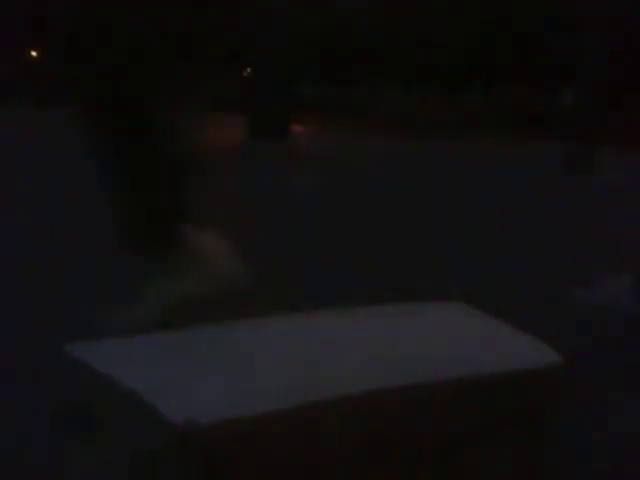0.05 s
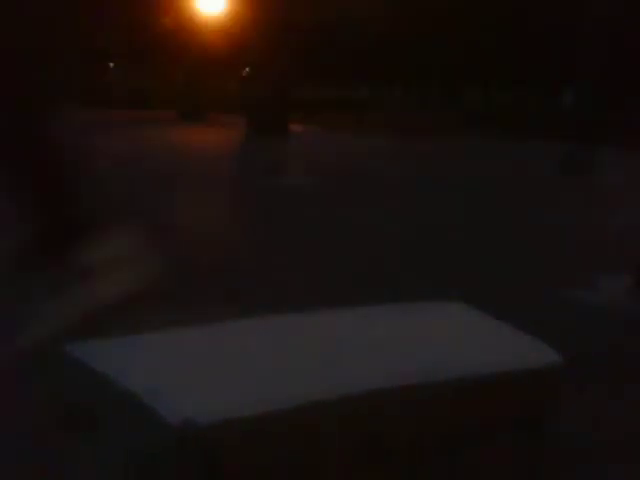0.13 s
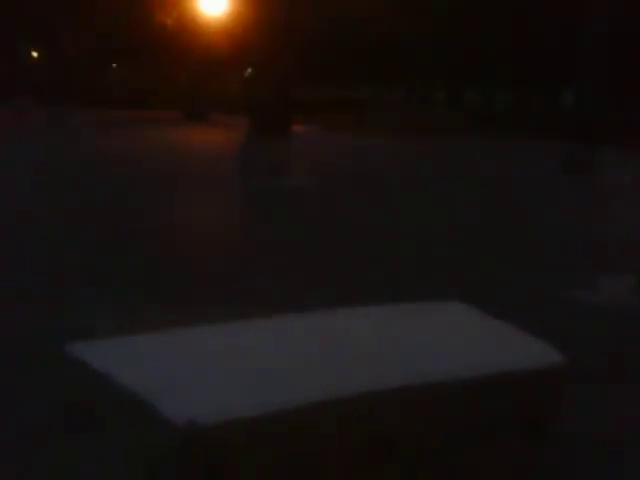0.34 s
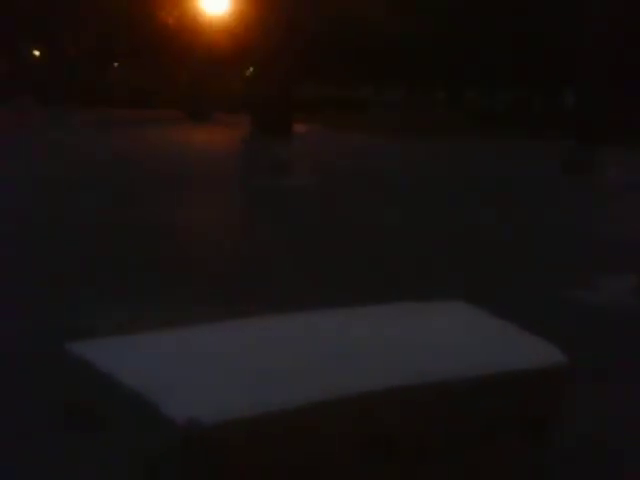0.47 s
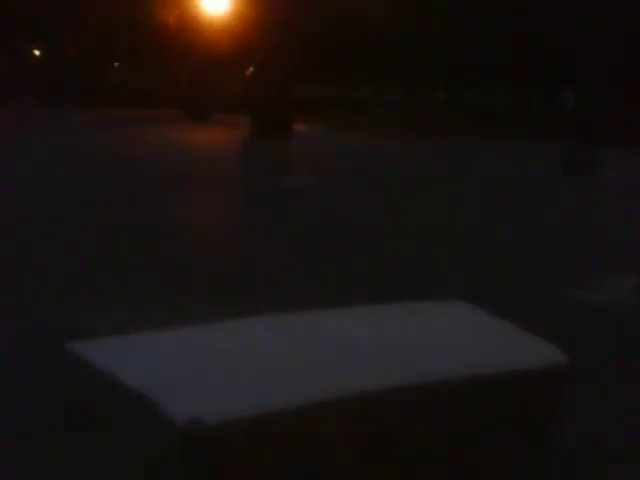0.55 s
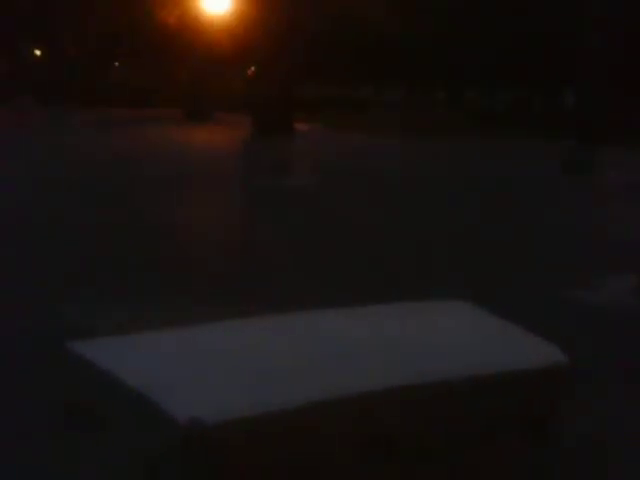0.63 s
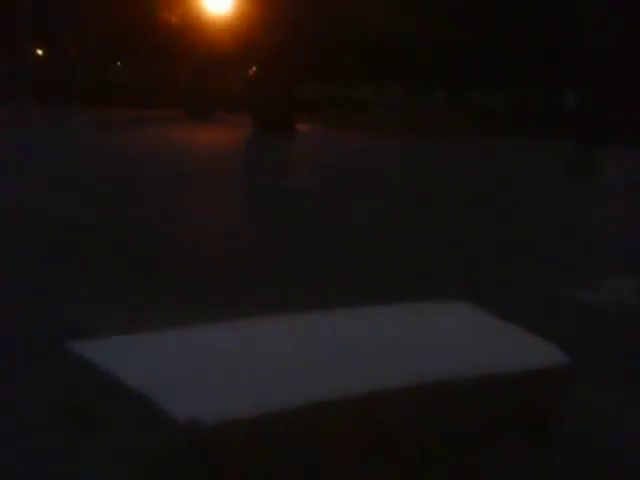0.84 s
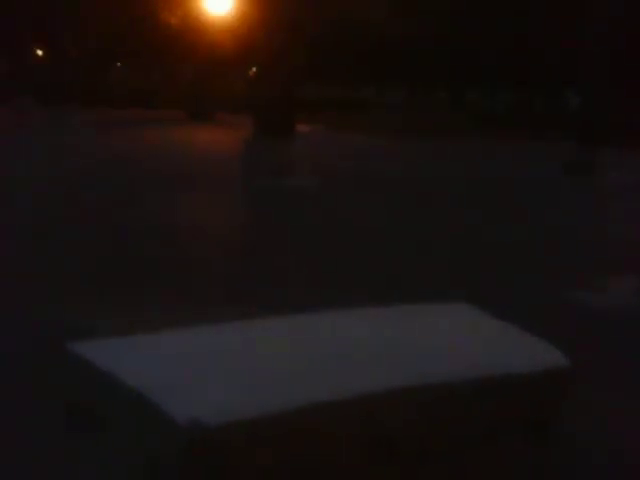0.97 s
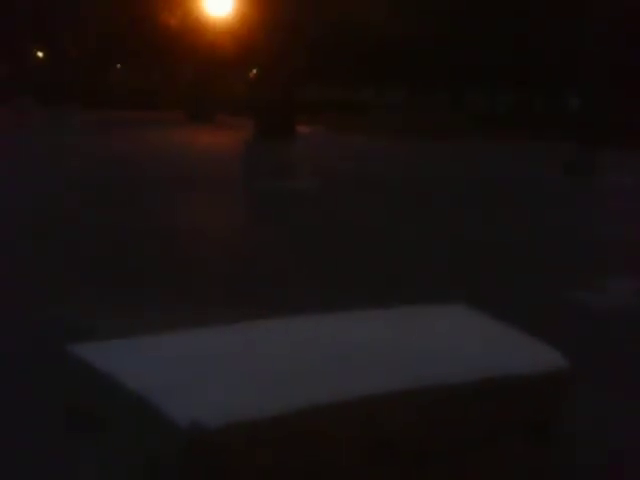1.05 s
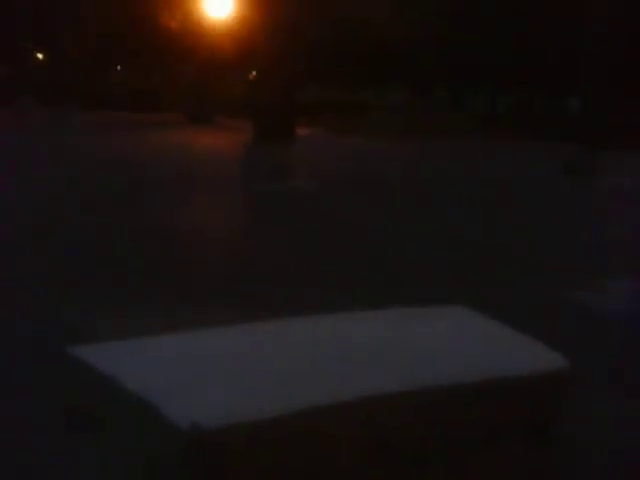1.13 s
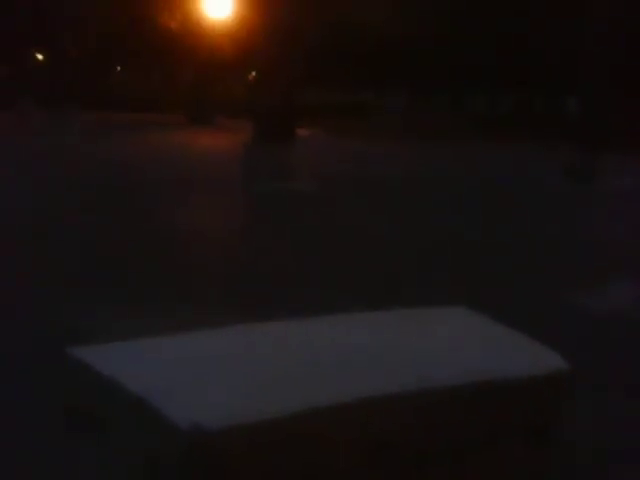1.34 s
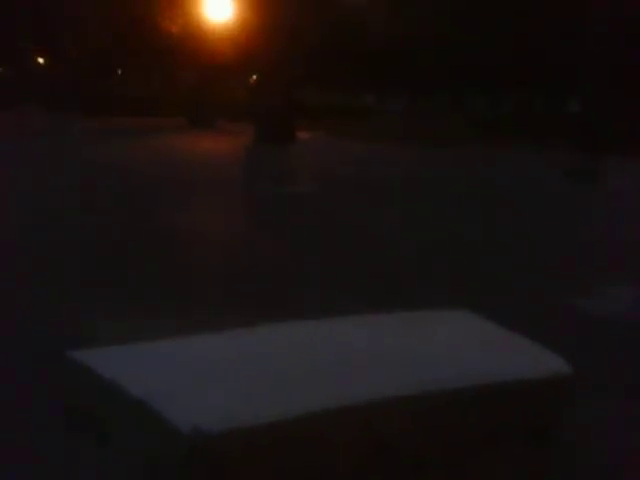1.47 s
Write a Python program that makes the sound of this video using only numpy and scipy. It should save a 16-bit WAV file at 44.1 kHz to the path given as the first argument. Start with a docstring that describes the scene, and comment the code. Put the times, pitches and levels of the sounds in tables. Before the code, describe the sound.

Inline skates clack down on concrete and roll away over a distant town rumble.

```python
"""Inline skates landing at night

Skates clip a ledge and slap down on the concrete of an open skate park. Each knock is a clack of
frame and wheels, a thud of boot and ledge, and a gritty scrape; the loudest overload a small, dull
microphone. The wheels roll away with a tick or two over a distant town rumble, and a faint high
whine warbles throughout."""
import sys
import numpy as np
from scipy import signal
from scipy.fft import rfft, irfft
from scipy.io import wavfile
from scipy.ndimage import uniform_filter1d

SR = 44100
rng = np.random.default_rng(int(sys.argv[2]) if len(sys.argv) > 2 else 0)


def persist_wave(psi):
    """Save psi, clipped to +-1, as 16-bit WAV."""
    counts = np.round(np.clip(psi, -1, 1) * 32767).astype(np.int16)
    wavfile.write(sys.argv[1], SR, np.atleast_2d(counts).T)


N = 66150  # 1.5 seconds


def from_db(db):
    """Turn decibels into a number to multiply a sound by."""
    return 10 ** (np.asarray(db) / 20)


def seconds():
    """The time of every sample."""
    return np.arange(N) / SR


def noise(spectrum):
    """Noise of typical size 1, shaped by rows of frequency and level, with nothing above 5000 Hz."""
    hz, db = np.transpose(spectrum)
    freqs = np.maximum(np.fft.rfftfreq(N, 1 / SR), 1)
    gain = from_db(np.interp(np.log(freqs), np.log(hz), db)) * (freqs < 5000)
    shaped = irfft(rfft(rng.standard_normal(N)) * gain, N)
    return shaped / shaped.std()


def drift(rate_hz):
    """A smooth random wobble of typical size 1; a higher rate wobbles faster."""
    pole = np.exp(-2 * np.pi * rate_hz / SR)
    wobble = signal.lfilter([1], [1, -2 * pole, pole * pole], rng.standard_normal(2 * N))[N:]
    return wobble / wobble.std()


# The tone of the town. Each row: frequency in Hz, relative level in dB.
TOWN_SPECTRUM = [(20, -18), (40, -5), (70, -3), (150, -1), (280, -4.5), (450, -9), (620, -12), (900, -7),
                 (1150, -12), (1550, -22.5), (2000, -24), (3400, -23), (4100, -36)]

def distant_town(level_db=-33.5):
    """The far-off town blends into a steady rumble and hiss."""
    return from_db(level_db) * noise(TOWN_SPECTRUM)


# How far the whine swings. Each row: time in seconds, lowest pitch in Hz, highest pitch in Hz.
WHINE_RANGE = [(0, 2304, 3742), (0.599, 2653, 3680), (1.001, 2898, 3525), (1.5, 2874, 3544)]

def warbling_whine(warble_hz=24.42, whine_db=-48.5, pip_db=-56):
    """A thin, raspy tone sags and climbs many times a second, with a higher pip on each climb."""
    t = seconds()
    times, lows, highs = np.transpose(WHINE_RANGE)
    low_hz, high_hz = np.interp(t, times, lows), np.interp(t, times, highs)
    cycle = (t - .008) * warble_hz % 1
    hold_end, fall_end = 0.14, 0.71  # shares of one cycle
    sag = np.minimum((fall_end - cycle) / (fall_end - hold_end), 1) ** 4
    climb = np.sin(np.pi / 2 * (cycle - fall_end) / (1 - fall_end))
    height = np.where(cycle < fall_end, sag, climb)  # 0 at the bottom, 1 at the top
    # Fast wobbles in pitch and level make both tones raspy.
    whine_hz = low_hz + (high_hz - low_hz) * height + 85 * drift(rate_hz=90)
    whine_gain = from_db(whine_db + 1.5 * height + 2.5 * drift(rate_hz=70))
    pip_hz = 3960 + 70 * drift(rate_hz=90)
    pip_gain = height * from_db(pip_db + 2.5 * drift(rate_hz=70))
    whine = whine_gain * np.sin(2 * np.pi * np.cumsum(whine_hz) / SR)
    pip = pip_gain * np.sin(2 * np.pi * np.cumsum(pip_hz) / SR)
    return whine + pip


# The tone of wheels on concrete. Each row: frequency in Hz, relative level in dB.
ROLL_SPECTRUM = [(60, -8), (130, -2), (180, 3), (240, -2), (330, 6), (420, -1), (520, -15.5), (780, -11.5),
                 (1150, -9.5), (1600, -37.5), (2400, -16.5), (3400, -43.5), (4100, -34)]

def rolling_wheels(start_s=0.26, rise_s=0.01, start_db=-33.5, fade_db_per_s=3.5):
    """After the landing the wheels rumble unevenly and fade as they roll away."""
    age = np.maximum(seconds() - start_s, 0)
    fade_in = np.minimum(age / rise_s, 1)
    level_db = start_db - fade_db_per_s * age + 2.5 * drift(rate_hz=20.3)
    return fade_in * from_db(level_db) * noise(ROLL_SPECTRUM)


# The tone of the park's echo. Each row: frequency in Hz, relative level in dB.
ECHO_SPECTRUM = [(60, -36), (150, -14.5), (260, -3), (400, -31.5), (550, -13), (800, -0.5), (1200, -5),
                 (1700, -4.5), (2300, -6.5), (4000, -9.5)]

def park_echo(sound, level_db=-11, build_s=0.004, fade_s=0.88):
    """Ramps and trees scatter the sound back as a weak, dull tail."""
    t = seconds()
    tail = noise(ECHO_SPECTRUM) * (1 - np.exp(-t / build_s))
    tail *= np.exp(-np.log(1000) * t / fade_s)  # 60 dB down after fade_s
    strongest_band_power = np.max(uniform_filter1d(np.abs(rfft(tail)) ** 2, size=200))
    tail /= np.sqrt(strongest_band_power)
    return from_db(level_db) * signal.fftconvolve(sound, tail)[:N]


def ring(tones, age, attack_s):
    """A struck object rings with a few dying tones, each a little louder or softer on every blow."""
    swell = 1 - np.exp(-(age / attack_s) ** 2)
    ringing = np.zeros(N)
    for hz, db, fade_s in tones:
        strength = from_db(db + 1.5 * rng.standard_normal())
        ringing += strength * np.exp(-np.log(1000) * age / fade_s) * np.sin(2 * np.pi * hz * age)
    return swell * ringing


# The low ring of boot and ledge. Each row: pitch in Hz, relative level in dB, seconds to fade by 60 dB.
THUD_TONES = [(167.8, -5.5, 0.039), (237.3, 3, 0.023), (311.8, 2, 0.023), (396, -13, .026)]
# The ring of frame and wheels. Each row: pitch in Hz, relative level in dB, seconds to fade by 60 dB.
CLACK_TONES = [(731, -8.5, 0.025), (904, 1.5, 0.012), (1072, -4, 0.014), (1170, -9.5, 0.0099)]
# The tone of a gritty scrape. Each row: frequency in Hz, relative level in dB.
SCRAPE_SPECTRUM = [(60, -37), (130, 0.5), (250, 18.5), (400, -4.5), (540, -4.5), (850, 6.5), (1200, 1),
                   (1550, -11.5), (2200, -5), (3300, -8), (4300, -25)]
# Seven quick knocks, then two faint ticks. Each row: start in seconds, relative levels of the thud,
# the clack and the scrape in dB, length of the scrape in seconds.
KNOCKS = [(0.2462, 2, 3, -17, .004), (0.2690, 3, 2, -2, .006), (0.2735, 2, -1, -1, .002),
          (0.2805, -10, -8, -8, .003), (0.3068, 3, 3, -1, .005), (0.3185, -2, -10, -9, .004),
          (0.3232, -1, -17, -20, .002), (1.2160, -36, -35, -33, .002), (1.3140, -25, -18.5, -22, .003)]

def skate_knocks(attack_s=.001, scrape_release_s=0.0032, thud_delay_s=.0012):
    """Each time a skate hits, it scrapes briefly, clacks, and thuds a moment later."""
    knocks = np.zeros(N)
    for start_s, thud_db, clack_db, scrape_db, scrape_s in KNOCKS:
        age = np.maximum(seconds() - start_s, 0)
        sliding = np.minimum(age / attack_s, 1)
        sliding *= np.exp(-np.maximum(age - scrape_s, 0) / scrape_release_s)
        knocks += from_db(scrape_db - 3.5) * sliding * noise(SCRAPE_SPECTRUM)
        knocks += from_db(clack_db) * ring(CLACK_TONES, age, attack_s)
        thud_age = np.maximum(age - thud_delay_s, 0)
        knocks += from_db(thud_db) * ring(THUD_TONES, thud_age, attack_s=0.0017)
    return knocks


def scene():
    """Add the knocks, their echo, the wheels, the town and the whine into one channel."""
    knocks = skate_knocks()
    return (knocks + park_echo(knocks) + rolling_wheels() + distant_town() + warbling_whine())[None]


def record(dry, input_limit=0.671, output_limit=0.711, mic_top_hz=4202, output_top_hz=16000):
    """A small microphone flattens loud peaks, cuts the treble, then flattens what still sticks out."""
    mic_filter = signal.cheby1(14, .3, mic_top_hz, fs=SR, output="sos")
    output_filter = signal.cheby2(12, 70, output_top_hz, fs=SR, output="sos")
    overloaded = np.clip(dry, -input_limit, input_limit)
    dull = signal.sosfilt(mic_filter, overloaded)
    return signal.sosfilt(output_filter, np.clip(dull, -output_limit, output_limit))


dry = scene()
out = record(dry)
persist_wave(out)
```